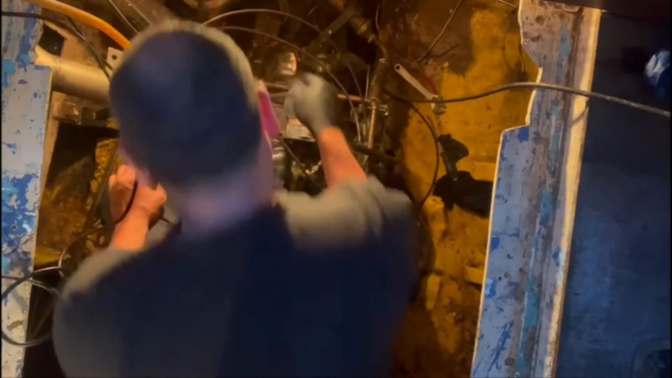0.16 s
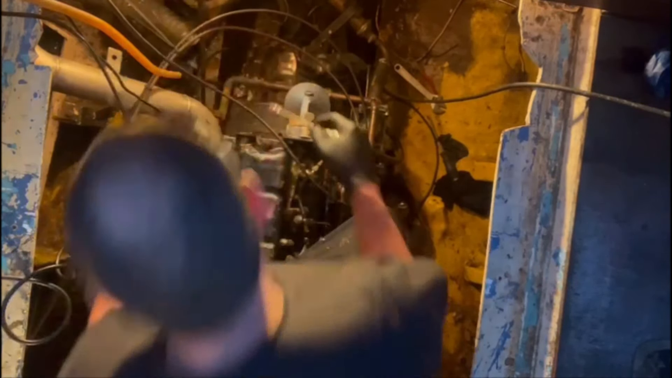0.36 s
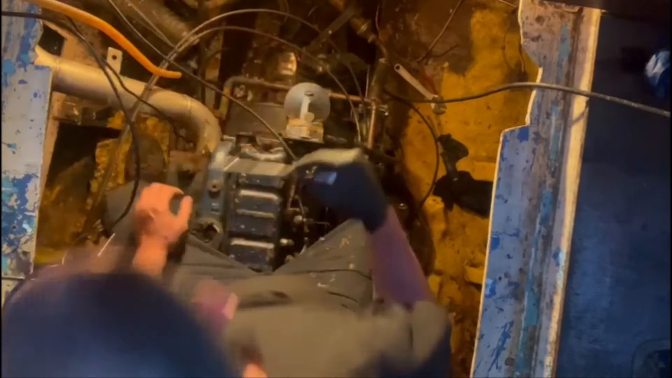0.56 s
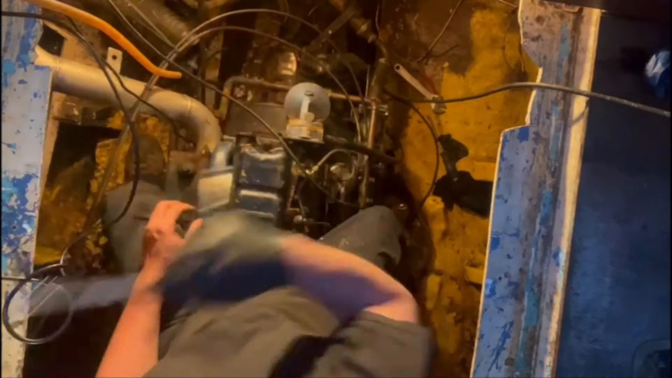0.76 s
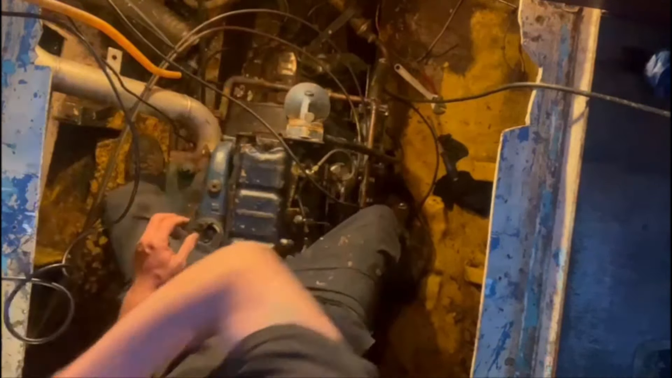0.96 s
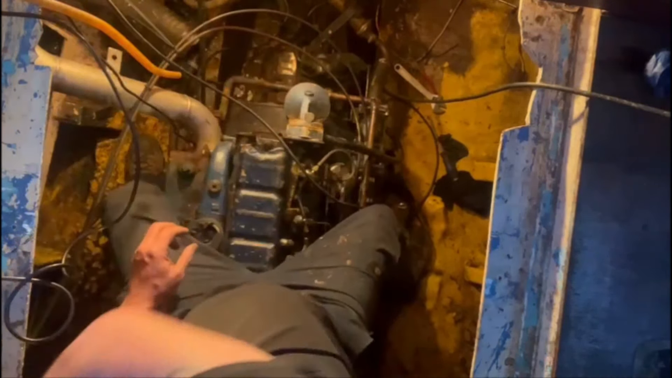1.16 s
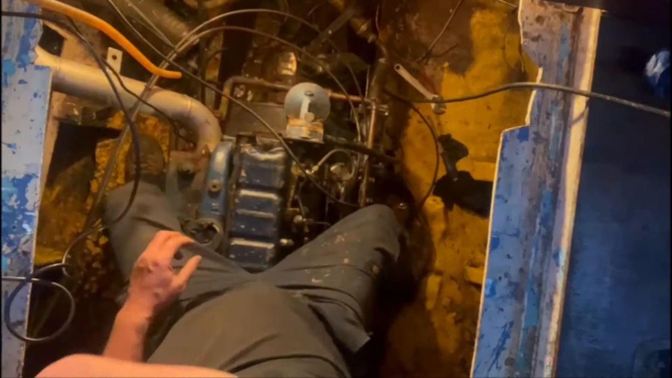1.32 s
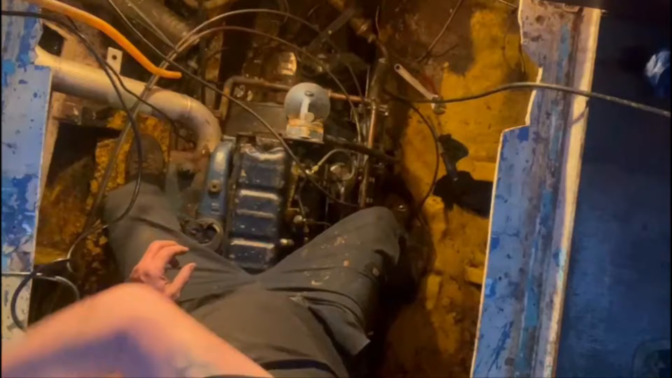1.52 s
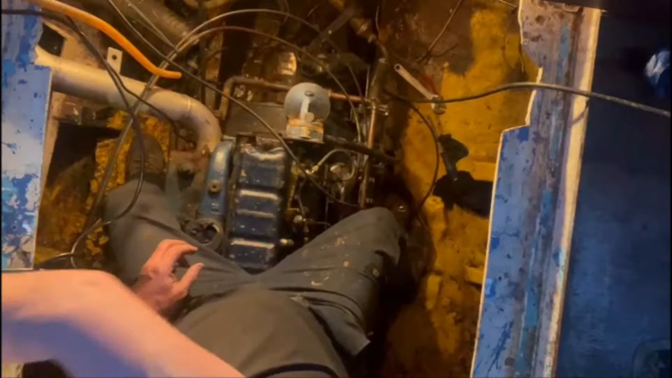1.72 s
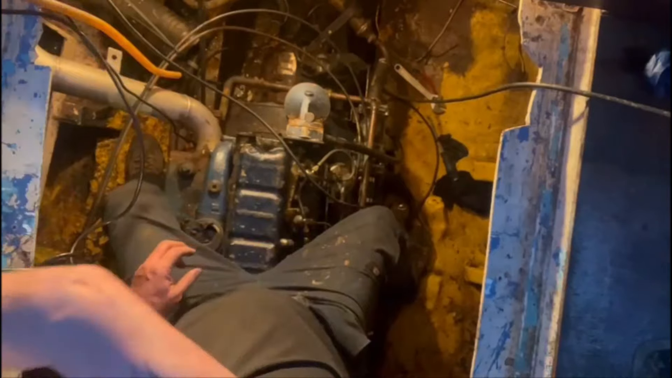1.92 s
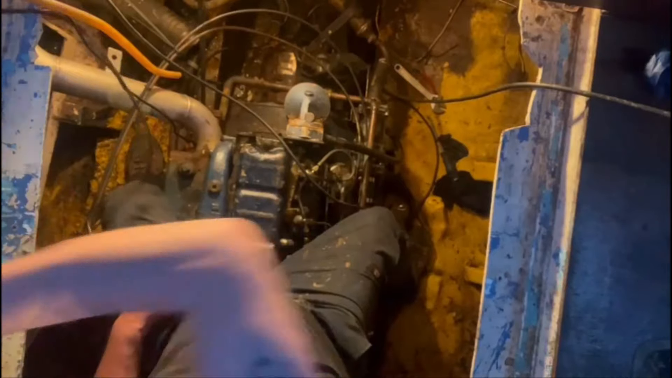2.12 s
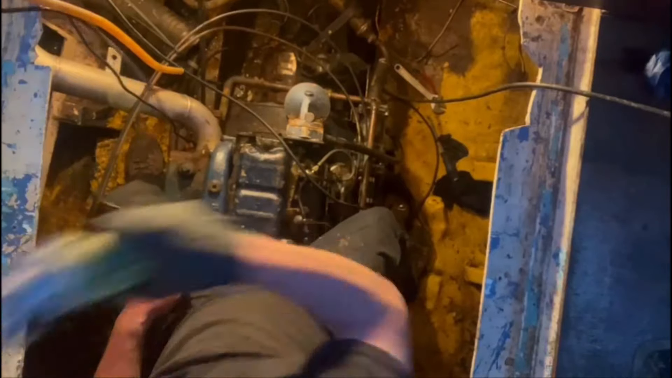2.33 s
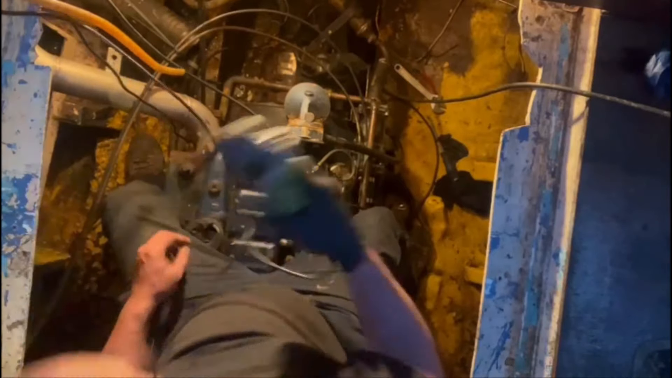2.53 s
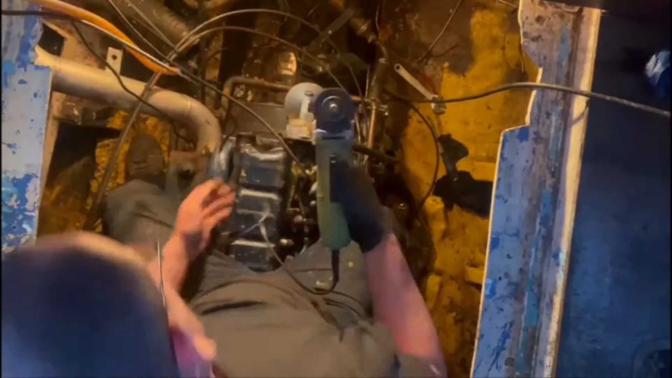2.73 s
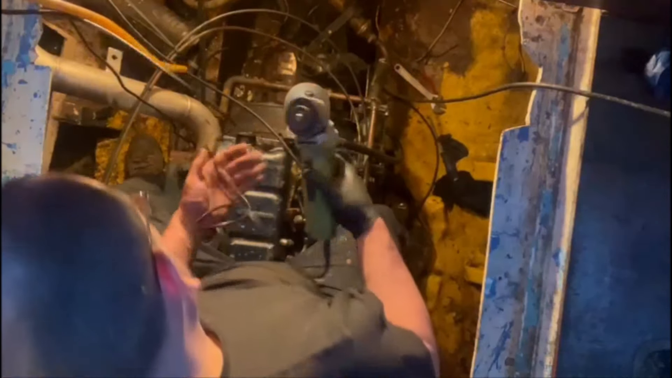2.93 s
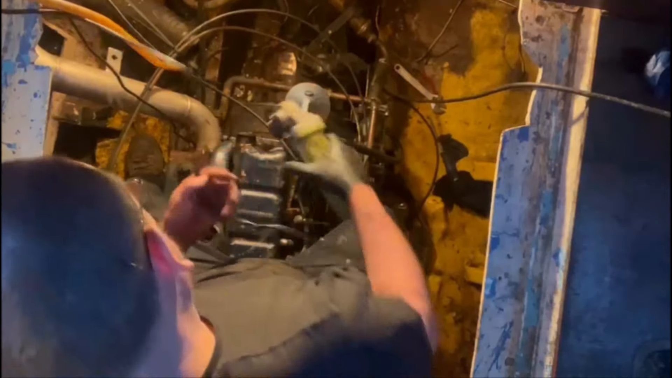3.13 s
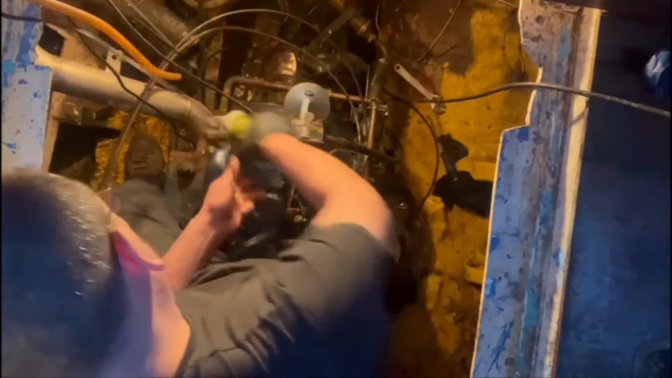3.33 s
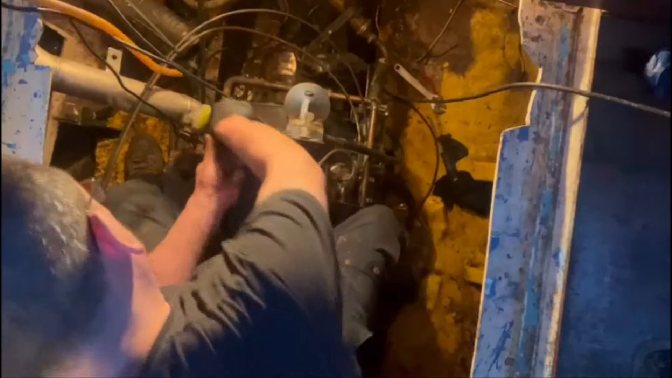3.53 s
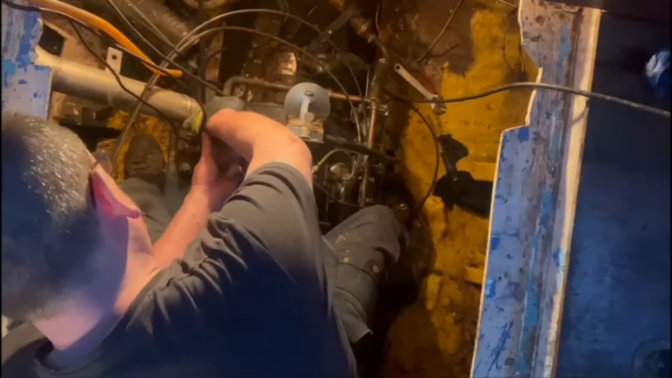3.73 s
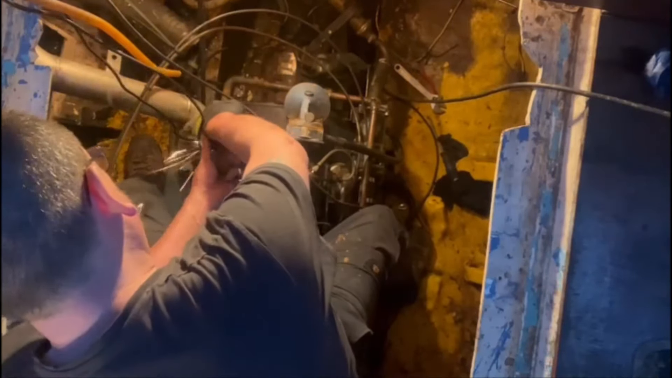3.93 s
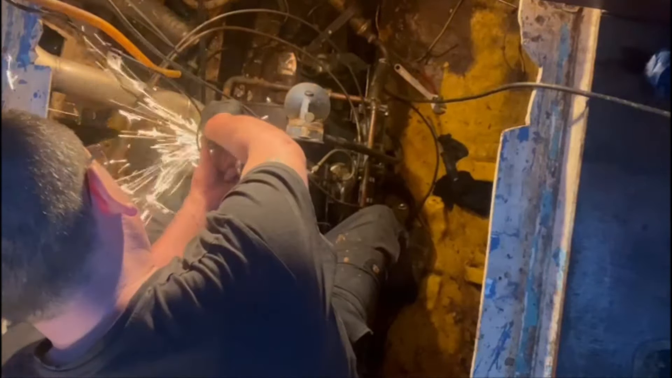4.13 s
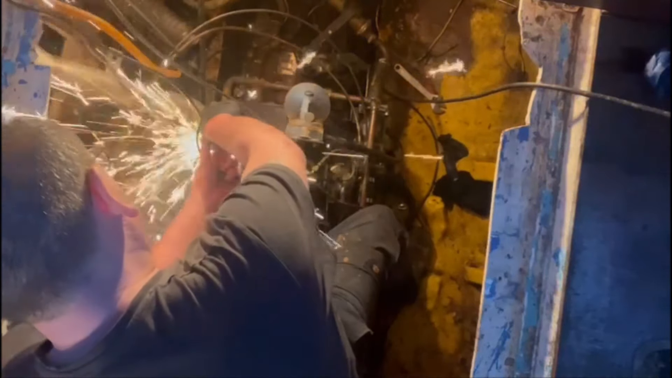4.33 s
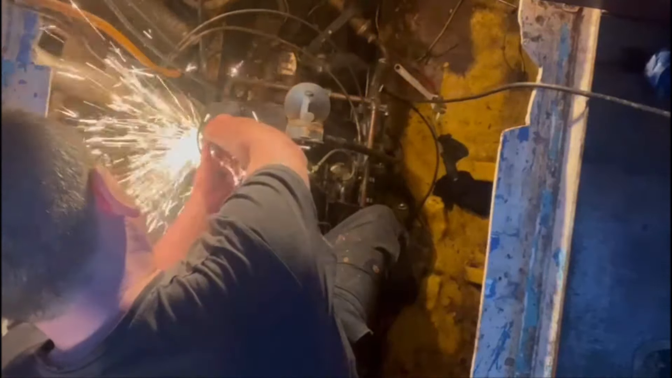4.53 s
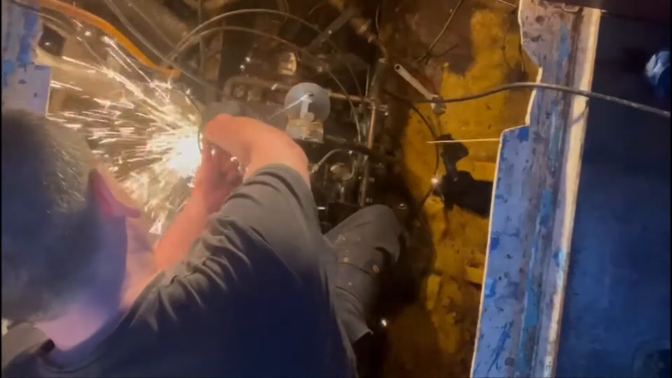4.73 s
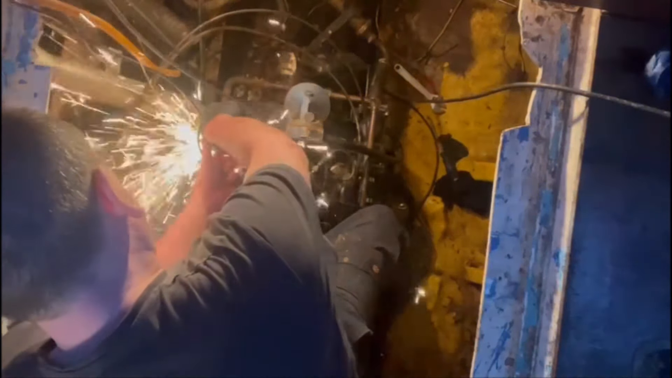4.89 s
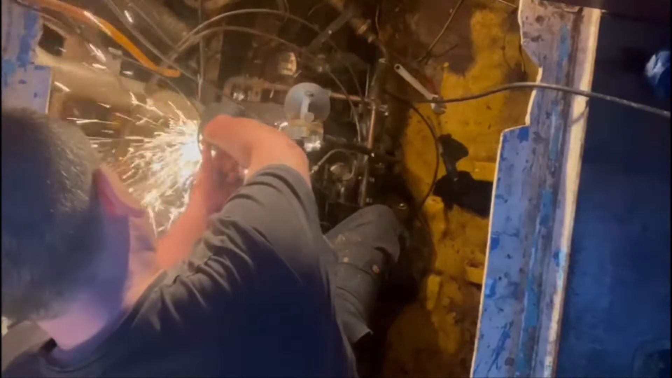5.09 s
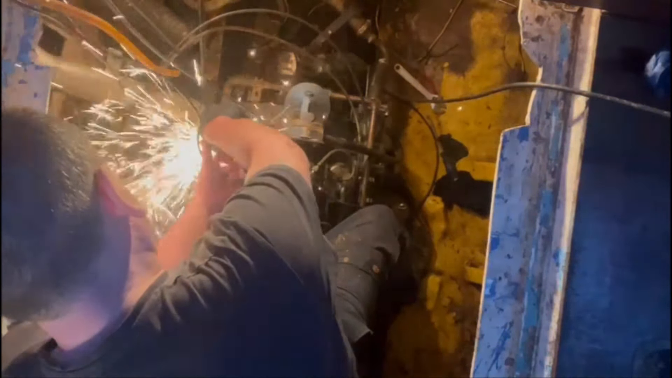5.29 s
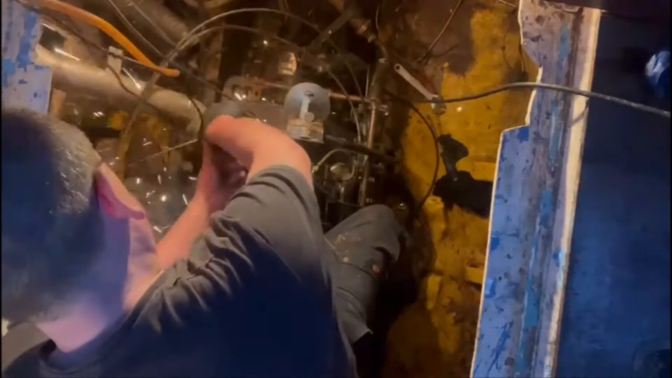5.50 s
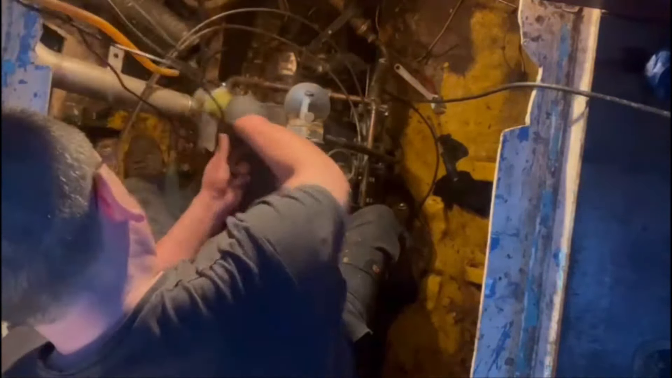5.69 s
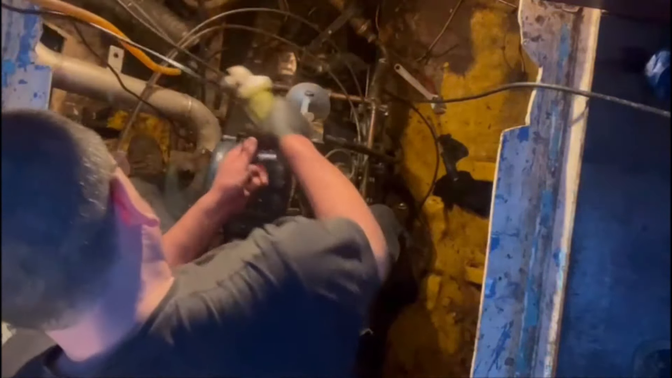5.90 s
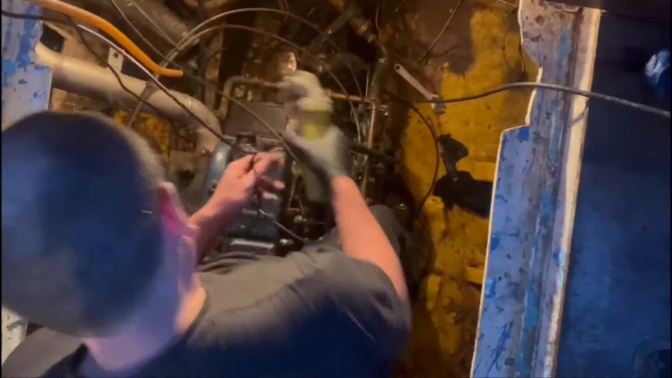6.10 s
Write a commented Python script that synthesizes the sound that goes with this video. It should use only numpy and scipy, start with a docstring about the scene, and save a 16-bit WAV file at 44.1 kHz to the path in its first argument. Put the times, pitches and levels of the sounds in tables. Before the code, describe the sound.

Close in a boat's steel engine bay, a small tool's ring fades into quiet rustle. Loud double knocks strike boards and hull, with softer bumps and scuffs after. A grinder suddenly cuts steel, speeded up, so the harsh tearing hiss is unnaturally high and bright. It stops abruptly; at natural pitch the freed motor briefly rises, then coasts down with rattling gears and falling whine. Close stereo microphone.

```python
"""In a boat's engine bay, amid close steel, a tool rings out, clothes rustle and blows knock on the hull.
An angle grinder runs up and cuts a steel stud; the cut is in fast motion, so about three times higher.
Then, at natural pitch, the disc leaves the steel, the motor picks up briefly and coasts down, gears rattling.
Abrasion, scuffs and air are coloured noise; the tool and hull are decaying modes; the motor adds sine tones.
"""
import sys
import numpy as np
from scipy import signal
from scipy.fft import rfft, irfft, next_fast_len
from scipy.io import wavfile
from scipy.ndimage import uniform_filter1d

SR = 44100
rng = np.random.default_rng(int(sys.argv[2]) if len(sys.argv) > 2 else 0)


def store_pcm(level_fs):
    """Save levels as 16-bit WAV."""
    pcm = np.round(np.clip(level_fs, -1, 1) * 32767).astype(np.int16)
    wavfile.write(sys.argv[1], SR, np.atleast_2d(pcm).T)


N = 271201

T = np.arange(N) / SR
SIZE = next_fast_len(N)
FREQ = np.maximum(np.arange(SIZE // 2 + 1) * SR / SIZE, 1)
SWITCH_ON_S, CUT_START_S, CUT_END_S, SWITCH_OFF_S = 3.626, 3.654, 5.484, 5.615


def amp(db):
    """Decibels to gain."""
    return 10 ** (np.asarray(db) / 20)


def unit(x):
    """Scale to rms 1."""
    return x / np.sqrt(np.mean(x ** 2))


def curves(table):
    """Each column of a timed table, sample by sample."""
    s, *columns = np.transpose(table)
    return [np.interp(T, s, c) for c in columns]


def at(points, hz=FREQ):
    """Read (Hz, value) points on a log-frequency axis."""
    f, value = np.transpose(points)
    return np.interp(np.log(hz), np.log(f), value)


def shape(x, gain):
    """Filter with a gain for each frequency."""
    return irfft(rfft(x, SIZE) * gain, SIZE)[..., :N]


def band(lo_hz, hi_hz):
    """Steep pass band; neighbours add up to even power."""
    return ((1 + (lo_hz / FREQ) ** 12) * (1 + (FREQ / hi_hz) ** 12)) ** -.5


def resonances(rings):
    """Power response of (Hz, width in Hz, dB) resonances."""
    return sum(amp(db) ** 2 / (1 + (2 * (FREQ - hz) / width) ** 2) ** 2 for hz, width, db in rings)


def noise():
    """Two unrelated white noises."""
    return rng.standard_normal((2, N))


def spread(pair, gain, width):
    """Colour two unrelated signals and decode them to left and right as mid (rms 1) and side."""
    mid, side = shape(pair, np.array([gain, gain * amp(at(width))]))
    return np.array([mid + side, mid - side]) / np.std(mid)


def walk(rate):
    """Smooth random wander, spread 1, with about `rate` new values a second."""
    k = max(int(SR / rate), 1)
    steps = np.repeat(rng.standard_normal(N // k + 1), k)
    return unit(uniform_filter1d(uniform_filter1d(steps, k), k)[:N])


def between(start, end):
    """On from start to end, with edges of a millisecond."""
    return np.clip((T - start) * 1000, 0, 1) * np.clip((end - T) * 1000, 0, 1)


def swell(s, half):
    """Smooth rise and fall around one moment."""
    return np.exp(-((T - s) / half) ** 2)


def settling(start, settled_db, surge_db, settle_s, attack_s):
    """Gain that rises to a surge and relaxes to a steady level."""
    age = np.maximum(T - start, 0)
    return (1 - np.exp(-age / attack_s)) * amp(settled_db + surge_db * np.exp(-age / settle_s))


def grit(per_s, scatter_db):
    """Dense tiny impacts of uneven size."""
    impacts = rng.random((2, N)) < per_s / SR
    return unit(impacts * noise() * amp(scatter_db * rng.standard_normal(N)))


def near_walls(x, t60, wet_db, drift):
    """Close steel surfaces add a dense short echo; its comb shifts as the hands move."""
    t, out = T[:SR // 4], x
    for _ in range(3):
        echo = rng.standard_normal((2, len(t))) * amp(-60 * t / t60)
        echo /= np.sqrt(np.sum(echo ** 2, axis=1, keepdims=True))
        sway = np.sin(2 * np.pi * (drift * T + rng.random()) + walk(3))
        out = out + amp(wet_db) * sway * signal.fftconvolve(x, echo, axes=1)[:, :N]
    return out


def wavering_tone(hz, waver, rate):
    """Unsteady friction tone, rms near 1."""
    phase = 2 * np.pi * np.cumsum(hz * (1 + waver * walk(rate))) / SR
    return np.sqrt(2) * np.sin(phase) * amp(3 * walk(rate / 3) - 2.5)


# The motor's free speed in fast motion, and how fast it runs up to it.
FREE_HZ, RUN_UP_S = 1728, .06
# Load on the disc. Each row: time in seconds, share of the speed lost.
LOAD = [(3.95, 0), (4.11, .031), (4.35, .084), (4.56, .106), (4.9, .114), (5.48, .16)]
# Broad colour of the cut. Each row: frequency in Hz, level in dB.
CUT_COLOUR = [(71, -78), (120, -41.5), (333, -25), (426, -32), (590, -25), (667, -33.5), (888, -20.5),
              (1640, -14.5), (1970, -16.5), (4360, 1.5), (5350, 2), (6300, 3), (7420, -1), (8050, -2),
              (15800, -4)]
# Resonances of disc, guard and stud. Each row: frequency in Hz, width in Hz, dB over the broad noise.
CUT_RINGS = [(326, 19, 8.5), (596, 36, 7), (2234, 30, 9), (3062, 41, 9.5), (3976, 180, 7), (4430, 160, 6),
             (4400, 120, -0.5), (4890, 110, 1.5), (5100, 80, -9), (5710, 92, -5.5), (6040, 180, 0),
             (6510, 200, 6.5), (6540, 81, -4.5), (7890, 170, 11.5), (8520, 110, 6.5), (9100, 900, 0.5),
             (11000, 100, 4), (12300, 110, 1), (15000, 300, -1), (15000, 240, -2)]
# Stereo width of the cut. Each row: frequency in Hz, side minus mid in dB.
CUT_WIDTH = [(300, -44.5), (2000, -22), (3700, -4.5), (6000, -7), (8000, -13.5), (9500, -1), (11000, -1.5),
             (12500, -32), (15500, -10)]
# Surging layers. Each holds: settled level in dB, surge in dB, settling time in seconds, attack in seconds.
GRIND = (-34.2, 9.2, .5, .003)
HISS = (-34.5, 8.5, .65, .012)
MOTOR_AIR = (-43.3, 10.2, .52, .026)
SHAFT_TONE = (-56.5, 20, .43, .08)
# The shaft tone swells as its pitch passes a resonance of the housing.
HOUSING_HZ, HOUSING_WIDTH_HZ, HOUSING_DB = 1672, 56, 8
# Moments when the disc snags. Each row: time in seconds, extra grinding in dB.
SNAGS = [(3.775, 2.5), (4.552, 2.5), (5.465, 2.5)]
SNAG_HALF_S = .018
# Swells of a thin singing tone. Each row: time in seconds, half length in seconds, level in dB.
SING = [(4.18, .065, -34), (4.38, .03, -37)]


def cutting():
    """Abrasive grains tear the steel and ring disc and guard; the motor spins up, then sags under load."""
    run_up = 1 - np.exp(-np.maximum(T - SWITCH_ON_S, 0) / RUN_UP_S)
    hz = FREE_HZ * run_up * (1 - curves(LOAD)[0])
    turn = 2 * np.pi * np.cumsum(hz * (1 + 0.00202 * walk(70))) / SR
    # the disc, geared down from the shaft, bites harder once a turn and chatters
    bite = amp(1.4 * np.sin(turn / 3.3) + 1.0 * walk(160))
    coarse, fine = (near_walls(grit(per_s=9000, scatter_db=1.0) * bite, t60=.07, wet_db=-4.5, drift=1.8)
                    for _ in range(2))
    body = amp(at(CUT_COLOUR)) * np.sqrt(1 + resonances(CUT_RINGS))
    snag = amp(sum(db * swell(s, SNAG_HALF_S) for s, db in SNAGS))
    grind = spread(coarse, body * band(2700, 9500), CUT_WIDTH) * settling(CUT_START_S, *GRIND)
    hiss = spread(fine, body * band(9500, 19000), CUT_WIDTH) * settling(CUT_START_S, *HISS)
    air = spread(noise(), body * band(60, 3140), CUT_WIDTH) * settling(CUT_START_S, *MOTOR_AIR)
    housing_db = HOUSING_DB / (1 + (2 * (hz - HOUSING_HZ) / HOUSING_WIDTH_HZ) ** 4)
    tone_level = np.sqrt(2) * settling(CUT_START_S, *SHAFT_TONE) * amp(housing_db + 1.8 * walk(40))
    tone = tone_level * np.sin(turn)
    sing_level = sum(amp(db) * swell(s, half) for s, half, db in SING)
    sing = wavering_tone(11385, waver=.006, rate=300) * sing_level
    return ((grind + hiss) * snag + air + tone + sing) * between(CUT_START_S, CUT_END_S)


# Freed from the steel the shaft picks up until the switch is released; friction then slows it.
FREED_HZ, PICK_UP_HZ_PER_S, SLOWING_S = 462, 140, 1.43
# Broad colour of the run-down. Each row: frequency in Hz, level in dB.
COAST_COLOUR = [(35, -60), (60, -32), (305, -15), (340, -10.5), (403, -7), (521, -8), (646, -2), (1310, 1),
                (1460, -2), (1880, 1.5), (3660, -1.5), (6240, -1), (8610, -8), (10000, -32.5), (13000, -96),
                (22000, -120)]
# Gear head and guard. Each row: frequency in Hz, width in Hz, dB over the broad noise.
GUARD_RINGS = [(900, 40, -0.5), (1138, 50, 4), (1288, 150, 4.5), (1890, 140, 1), (2085, 50, -6),
               (2306, 120, 3.5), (2587, 60, 2), (3006, 31, 8), (3320, 140, 4.5), (4770, 23, 8)]
# Disc on steel at natural pitch. Each row: frequency in Hz, width in Hz, relative level in dB.
BITE_RINGS = [(1323, 67, -12), (1990, 190, -0.5), (3330, 74, 2.5), (4298, 53, 8.5), (5040, 500, -6.5),
              (5240, 450, -5), (6230, 180, 3)]
# Stereo width of the coasting grinder. Each row: frequency in Hz, side minus mid in dB.
COAST_WIDTH = [(60, -30), (380, -17), (700, -9), (1290, -6), (2380, -6), (4400, -15), (6000, -15),
               (9000, -4)]
# Surging layers. Each holds: settled level in dB, surge in dB, settling time in seconds, attack in seconds.
RATTLE = (-31.3, 4, .15, .001)
FAN_AIR = (-31.6, 8, .045, .001)
HUM = (-46.5, 6, .6, .06)
# The fan whine grows as its pitch falls; the level of the upper whine also follows the broad colour.
WHINE_DB, WHINE_DB_PER_OCTAVE, UPPER_WHINE_DB = -42.5, -15, -45


def coasting():
    """A last bite rings away; gears rattle, the shaft hums and the fan whines, rising briefly, then falling."""
    driven_s = np.clip(T, CUT_END_S, SWITCH_OFF_S) - CUT_END_S
    coasted_s = np.maximum(T - SWITCH_OFF_S, 0)
    hz = (FREED_HZ + PICK_UP_HZ_PER_S * driven_s) * np.exp(-coasted_s / SLOWING_S)
    turn = 2 * np.pi * np.cumsum(hz * (1 + .002 * walk(150))) / SR
    body = amp(at(COAST_COLOUR)) * np.sqrt(1 + resonances(GUARD_RINGS))
    # the rattle pulses once for every 2.8 turns of the shaft
    impacts = grit(per_s=6000, scatter_db=3) * amp(3.1 * np.sin(turn / 2.8))
    teeth = near_walls(impacts, t60=0.27, wet_db=2.5, drift=1.5)
    rattle = spread(teeth, body * band(40, 3620), COAST_WIDTH) * settling(CUT_END_S, *RATTLE)
    air = spread(noise(), body * band(4000, 10000), COAST_WIDTH) * settling(CUT_END_S, *FAN_AIR)
    ringing_steel = np.sqrt(resonances(BITE_RINGS)) * band(500, 10000) ** 2
    last_bite = spread(grit(per_s=3000, scatter_db=3), ringing_steel, COAST_WIDTH)
    last_bite = last_bite * amp(-22) * swell(CUT_END_S, 0.068)
    hum = settling(CUT_END_S, *HUM) * amp(2.0 * walk(25)) * np.sin(turn)
    # the whine flutters, differently left and right, as it glides through the echoes of the bay
    flutter_db = 3.5 * np.array([walk(70), walk(70)])
    # the two whines sound at 18 and 24 times the shaft speed
    whine = amp(WHINE_DB + WHINE_DB_PER_OCTAVE * np.log2(hz / FREED_HZ)) * np.sin(18 * turn)
    upper = amp(UPPER_WHINE_DB + at(COAST_COLOUR, 24 * hz)) * np.sin(24 * turn)
    tones = np.sqrt(2) * (hum + (whine + upper) * amp(flutter_db))
    return (rattle + air + last_bite + tones) * between(CUT_END_S, np.inf)


# Knocks and clicks. Each row: start in seconds, level in dB, then bass and treble in dB relative to the middle.
KNOCKS = [(0.367, -49.5, -8, -34), (1.079, -50.5, -30, 13.5), (1.273, -11, -24, 8), (1.289, -12, -23, -1),
          (1.369, -7.5, -7, 2), (1.386, -16.5, -3, -6), (1.420, -30.5, 6, 4.5), (1.613, -52, 16, -10.5),
          (1.737, -29.5, -11, -4), (1.803, -33.5, 7, 11), (2.062, -26.5, 4, -24), (2.074, -32, 5, 6),
          (2.2, -46, -14, -22), (3.333, -46.5, -7, -27), (3.426, -33.5, -24, 1), (3.641, -54, -26, 33.5)]


def blow_sizes(hz):
    """Strength of every knock at one frequency: heavy blows have bass, hard ones treble."""
    s, db, bass_db, treble_db = np.transpose(KNOCKS)
    bass_share = at([(100, 1), (300, 0.5), (750, 0)], hz)
    treble_share = at([(1600, 0), (5000, 1)], hz)
    return amp(db + bass_db * bass_share + treble_db * treble_share)


def fade(times, sizes, t60):
    """Envelope of blows whose energies add and die away."""
    energy = np.zeros(N)
    energy[(times * SR).astype(int)] = sizes ** 2
    decay = np.exp(-2 * np.log(1000) / (t60 * SR))
    return np.sqrt(signal.lfilter([1], [1, -decay], energy + 1e-24))


# Broad colour of the blows. Each row: frequency in Hz, level in dB.
KNOCK_COLOUR = [(30, -36.5), (55, -6.5), (100, -3.5), (240, -1.5), (360, -0.5), (550, -4.5), (800, -4),
                (1500, -8), (2000, -7.5), (3500, -12.5), (6300, -26.5), (9000, -35), (11500, -54),
                (15000, -91)]
# Struck boards and fittings. Each row: frequency in Hz, width in Hz, dB over the broad colour.
BOARD_RINGS = [(380, 100, 0.5), (718, 140, 5.5), (1104, 75, 5), (1970, 720, 4), (2110, 80, 0.5),
               (2298, 130, 7.5), (2795, 76, 9.5), (6200, 150, 7.5)]
# Base decay of the bay, scaled below for ring and tail. Each row: frequency in Hz, seconds to fall 60 dB.
BAY_T60 = [(80, 0.91), (200, 0.29), (500, 0.35), (1500, 0.24), (4000, 0.26), (10000, 0.17)]
# Stereo width of the blows, hull included. Each row: frequency in Hz, side minus mid in dB.
KNOCK_WIDTH = [(60, -24), (200, -15), (380, -12), (700, -6), (1290, -1), (2380, -3.5), (4400, -8),
               (8120, -6)]


def knocks():
    """Each blow is a short crack and a dense ring of the bay, with a faint late tail, band by band."""
    times, out = np.transpose(KNOCKS)[0], 0
    colour = amp(at(KNOCK_COLOUR)) * np.sqrt(1 + resonances(BOARD_RINGS))
    for hz in np.geomspace(60, 60 * 2 ** 7.5, 12):
        gain = colour * band(hz / 2 ** (1 / 3), hz * 2 ** (1 / 3))
        band_share = np.sqrt(np.sum(gain ** 2) / np.sum(colour ** 2))
        sizes, t60 = blow_sizes(hz) * band_share, at(BAY_T60, hz)
        crack = amp(at([(200, -17), (1500, -9.5), (6000, 3)], hz)) * fade(times, sizes, t60=.03)
        ring = amp(-2.0) * fade(times, sizes, t60 * 0.86)
        tail = amp(-24.5) * fade(times, sizes, t60 * 1.8)
        out = out + spread(noise(), gain, KNOCK_WIDTH) * np.sqrt(crack ** 2 + ring ** 2 + tail ** 2)
    return out


# Slow ring of the plating, short ring of fittings.
# Each row: frequency in Hz, relative level in dB, seconds to fall 60 dB.
HULL = [(71, -8, 0.93), (96.4, -1.5, 0.62), (113.4, 0, 0.66), (168, -6, 0.89), (255.5, -7, .65),
        (280, -2, .35), (308, -11.5, .55), (364, 4.5, .25), (468, 0.5, .3), (458, -14.5, .45),
        (559, -14.5, 1), (619, -12, .55), (710, -14.5, 0.21), (843, -17.5, 0.74), (1093, -5.5, 0.12),
        (1136, -2.5, 0.081), (1826, -6, 0.22), (1835, 1, 0.27), (1935, 0.5, .22), (1870, -7, .24),
        (2237, -11, .3), (2330, -7, .26), (2750, -7, .22), (3170, -15, 0.17)]


def hull():
    """The same blows ring the decaying modes of hull and boards, each in its own mix."""
    starts, out = (np.transpose(KNOCKS)[0] * SR).astype(int), np.zeros((2, N))
    for hz, db, t60 in HULL:
        push = np.zeros(N, complex)
        push[starts] = blow_sizes(hz) * np.exp(2j * np.pi * rng.random(len(starts)))
        pole = np.exp((2j * np.pi * hz - np.log(1000) / t60) / SR)
        ring = signal.lfilter([1], [1, -pole], push + 1e-18)
        # opposite phase shifts left and right give the mode its width
        lag = amp(at(KNOCK_WIDTH, hz)) * rng.standard_normal()
        out += amp(db) * np.array([(ring * np.exp(1j * lag)).imag, (ring * np.exp(-1j * lag)).imag])
    return amp(-14.5) * out


# Stereo width of the bay, also for rustle and rumble. Each row: frequency in Hz, side minus mid in dB.
BAY_WIDTH = [(60, -24.5), (250, -13), (600, -6.5), (2000, -3), (5000, -17), (10000, 0.5)]
# Modes of the tool. Each row: frequency in Hz, relative level in dB, seconds to fall 60 dB.
TOOL = [(2186, -31, 0.31), (3288, -1.5, 0.29), (4530, -26, 0.43), (4640, -30, 0.51), (4947, -20, 0.21),
        (5389, -29, 0.47), (5755, -13, 0.19), (6000, -20, 0.27)]


def steel_tool():
    """A small steel tool rings out after a tap: decaying sines over a fading wash of the bay."""
    ring = sum(amp(db - 60 * T / t60) * np.sin(2 * np.pi * hz * T + rng.uniform(0, 2 * np.pi))
               for hz, db, t60 in TOOL)
    bay = spread(noise(), band(1480, 6400), BAY_WIDTH) * amp(-51 - 60 * T / 0.31)
    return ring * amp([[-25], [-28]]) + bay  # left, right


def scuff(hz):
    """Broad friction noise around one pitch."""
    gain = np.sqrt(resonances([(hz, .7 * hz, 0)])) * band(hz / 2, 3 * hz)
    return spread(noise(), gain, BAY_WIDTH)


# Colour of sliding cloth and cable. Each row: frequency in Hz, level in dB.
SWISH = [(710, -33.5), (1200, -9.5), (1710, -0.5), (2470, -4.5), (2900, -4.5), (6190, -6), (9220, -20),
         (11000, -60.5), (14300, -87), (22000, -120)]
# Swishes of sleeves and cable. Each row: time in seconds, half length in seconds, level in dB.
SWISHES = [(0.235, .022, -71), (0.42, .07, -75), (0.9, .15, -70), (1.11, .03, -67), (1.955, .065, -51),
           (2.07, .05, -43.5), (2.48, .056, -53.5), (2.687, .049, -62.5), (2.93, .13, -58),
           (3.575, .04, -47.5)]
# Gloves and tools on the boards, and once the boards shifting low after a heavy blow. Each row: time in
# seconds, half length in seconds, level in dB, pitch in Hz.
SCUFFS = [(0.647, .023, -58, 1900), (0.784, .018, -63, 3430), (0.95, .13, -68, 1850),
          (1.1, .02, -56.5, 2100), (1.27, .008, -25, 2200), (1.65, .1, -41.5, 140),
          (2.05, .04, -41.5, 1000), (2.072, .026, -32, 360), (2.49, .05, -57, 772),
          (2.687, .049, -59.5, 1400), (3.03, .07, -55, 820), (3.212, .016, -54.5, 760),
          (3.267, .021, -55.5, 760), (3.347, .012, -52.5, 750), (3.438, .009, -41, 850),
          (3.519, .08, -57.5, 786), (3.589, .02, -48.5, 990)]
# Faint rubbing goes on between the strokes; its level fidgets.
CLOTH_DB, RUB_DB, RUB_HZ, FIDGET_DB = -71, -75, 1700, 1
# The sliding cable squeaks once; its pitch arches up and down by this share.
SQUEAK_S, SQUEAK_HALF_S, SQUEAK_HZ, SQUEAK_DB, SQUEAK_ARCH = 2.86, .1, 3100, -62, .16


def rustle():
    """Cloth and cable slide in small catches, gloves scuff at their own pitch; the cable squeaks faintly."""
    fidget = amp(FIDGET_DB * walk(9))
    catches = near_walls(grit(per_s=3400, scatter_db=-3), t60=0.18, wet_db=1, drift=0.56)
    swish_level = amp(CLOTH_DB) * fidget + sum(amp(db) * swell(s, half) for s, half, db in SWISHES)
    swish = spread(catches, amp(at(SWISH)), BAY_WIDTH) * swish_level
    rubbing = scuff(RUB_HZ) * amp(RUB_DB) * fidget
    scuffs = rubbing + sum(scuff(hz) * amp(db) * swell(s, half) for s, half, db, hz in SCUFFS)
    slide = swell(SQUEAK_S, SQUEAK_HALF_S)
    squeak_hz = SQUEAK_HZ * (1 - SQUEAK_ARCH * (1 - slide))
    squeak = wavering_tone(squeak_hz, waver=0.014, rate=330) * amp(SQUEAK_DB) * slide
    return ((swish + scuffs) * amp(0.6 * walk(50)) + squeak) * between(0, SWITCH_ON_S)


# Colour of the background in the hull. Each row: frequency in Hz, level in dB.
RUMBLE = [(15, -30), (25, -8.5), (87, -0.5), (250, -13.5), (413, -14.5), (485, -22), (866, -20),
          (1350, -33), (2010, -24.5), (3000, -50), (3900, -75), (6600, -120)]


def rumble():
    """Low background noise inside the hull, all but gone during the fast-motion cut."""
    level_db = -59 + 0.74 * walk(19) - 0.55 * T - 33 * between(CUT_START_S, CUT_END_S)
    return spread(noise(), amp(at(RUMBLE)), BAY_WIDTH) * amp(level_db)


def scene():
    """Handling, the cut and the run-down."""
    # the blows have no extreme treble
    blows = shape(knocks() + hull(), band(20, 10500))
    return steel_tool() + rustle() + blows + cutting() + coasting() + rumble()


TOP_HZ = 15900


def record(dry):
    """The loudest peaks clip at full scale and a steep low-pass cuts the top."""
    low_pass = signal.ellip(10, .2, 80, TOP_HZ, fs=SR, output="sos")
    return signal.sosfilt(low_pass, np.clip(dry, -1, 1))


dry = scene()
out = record(dry)
store_pcm(out)
```